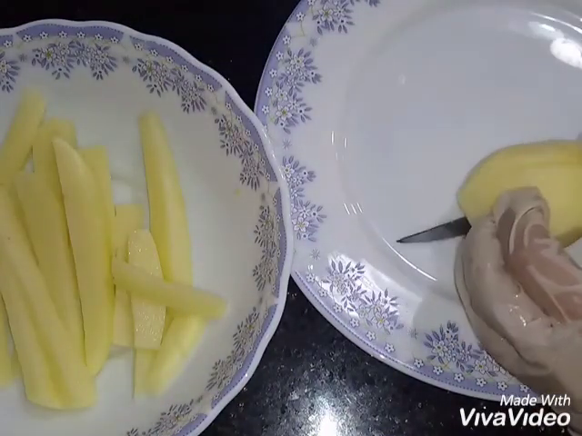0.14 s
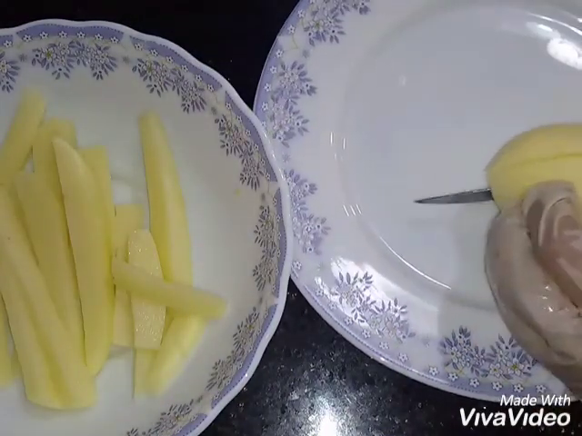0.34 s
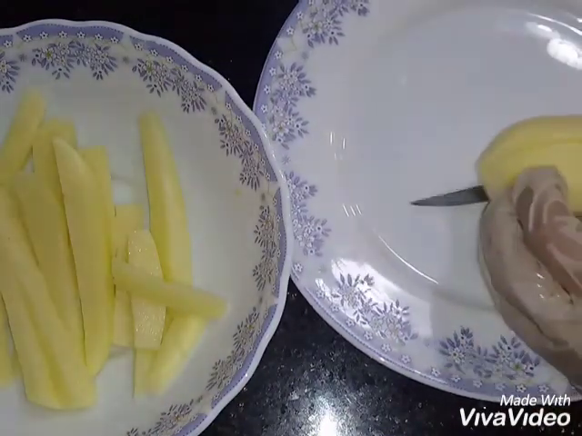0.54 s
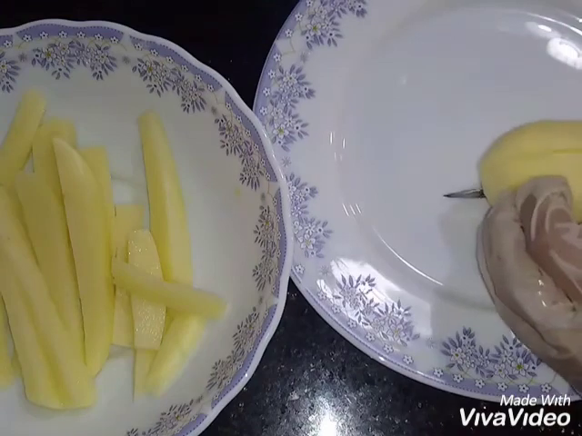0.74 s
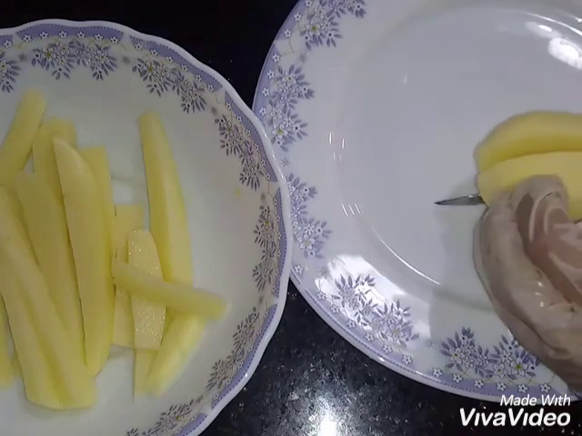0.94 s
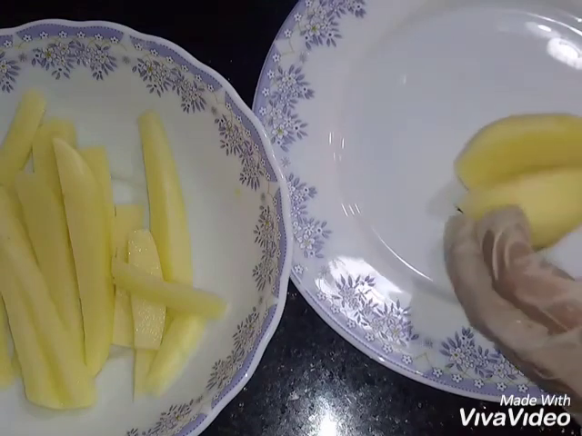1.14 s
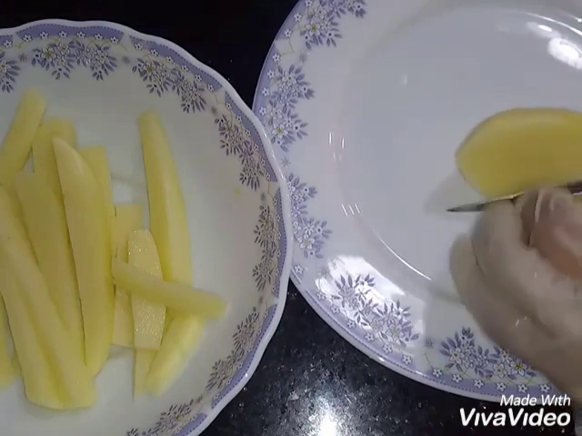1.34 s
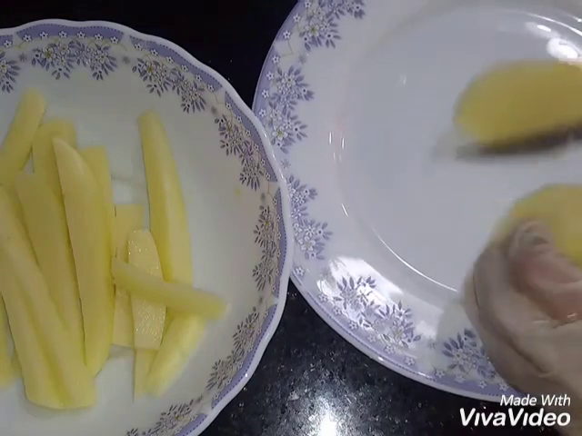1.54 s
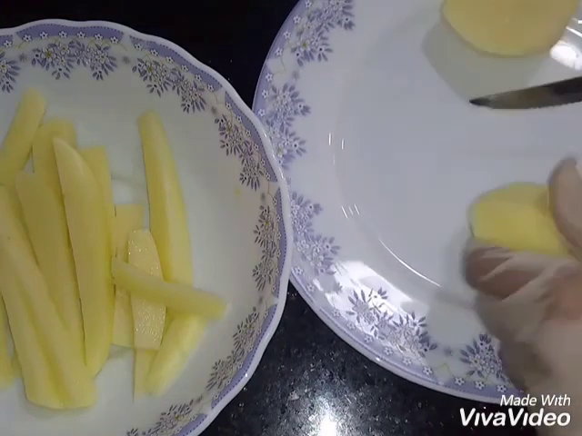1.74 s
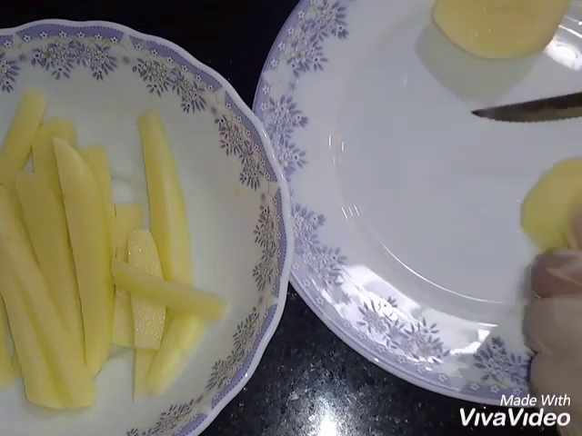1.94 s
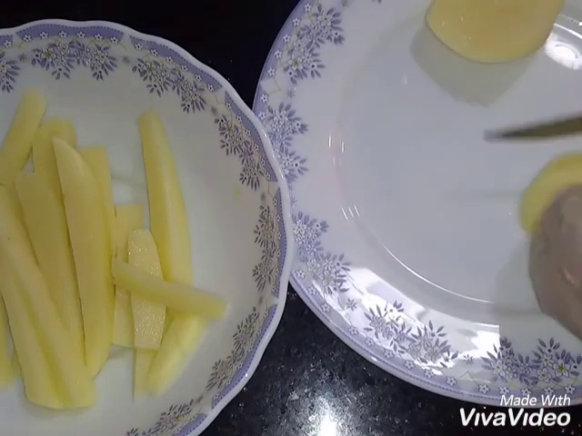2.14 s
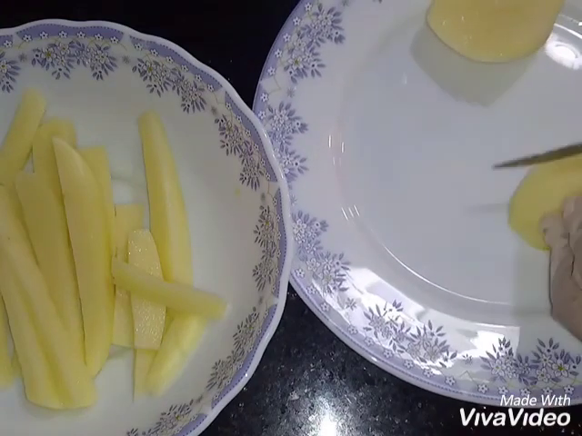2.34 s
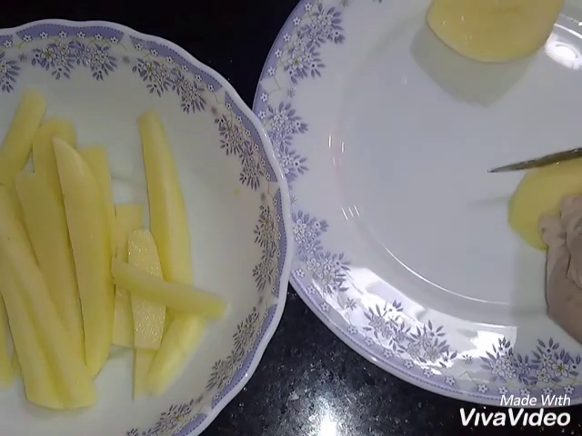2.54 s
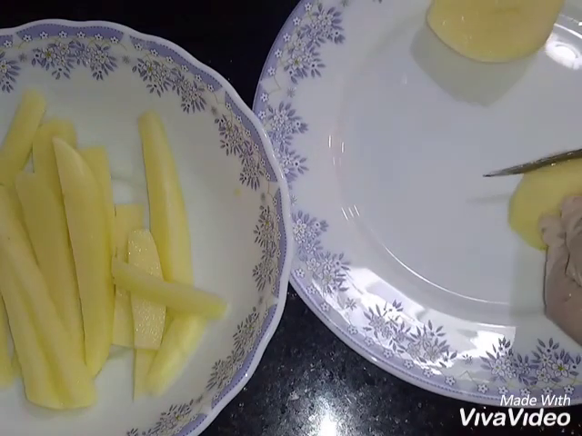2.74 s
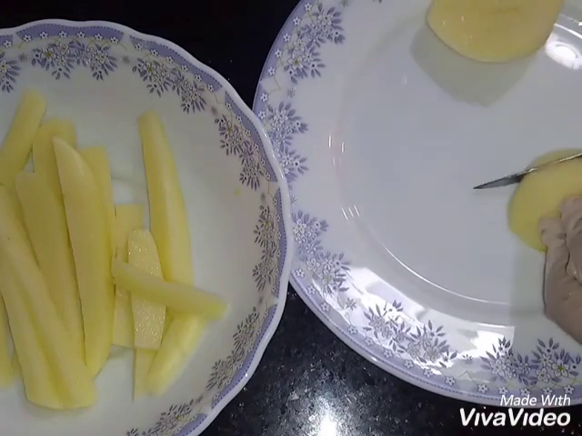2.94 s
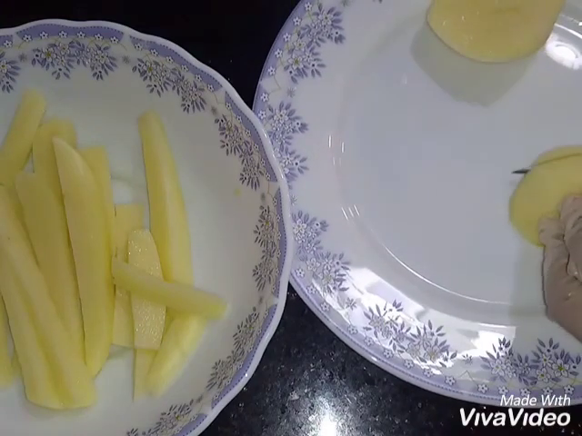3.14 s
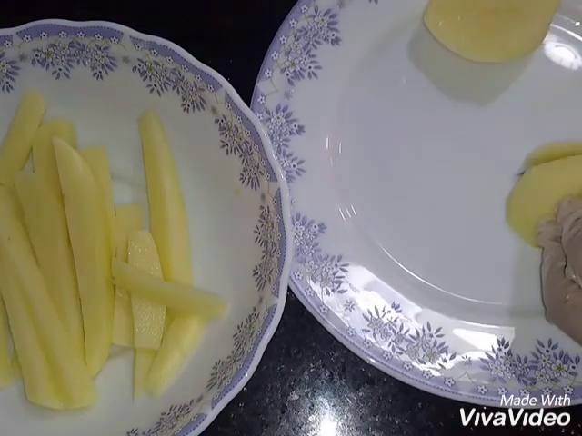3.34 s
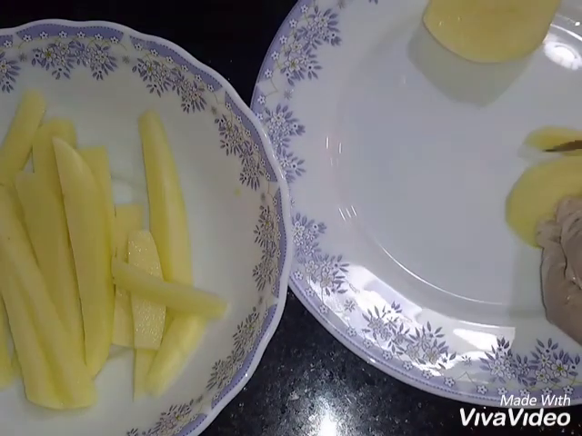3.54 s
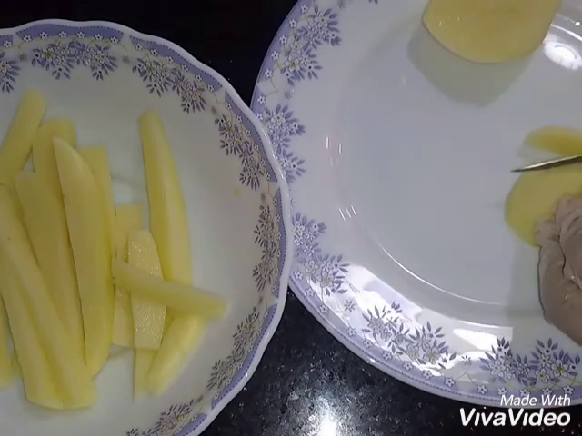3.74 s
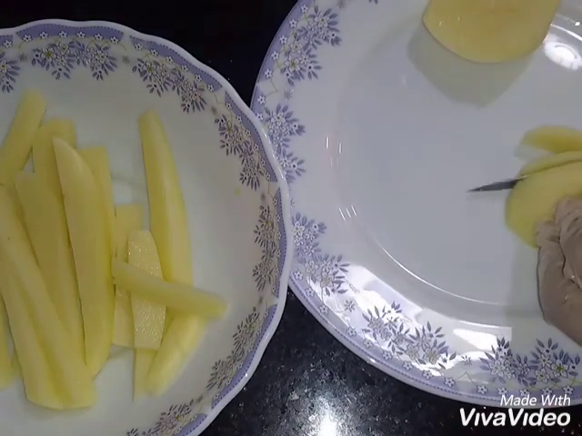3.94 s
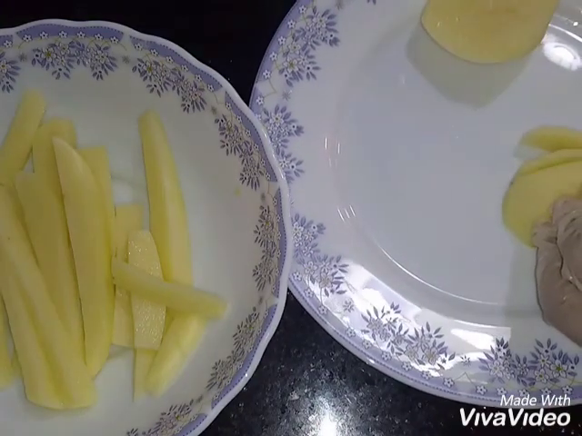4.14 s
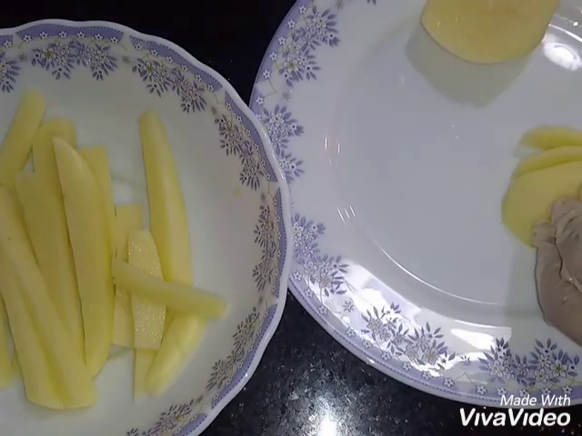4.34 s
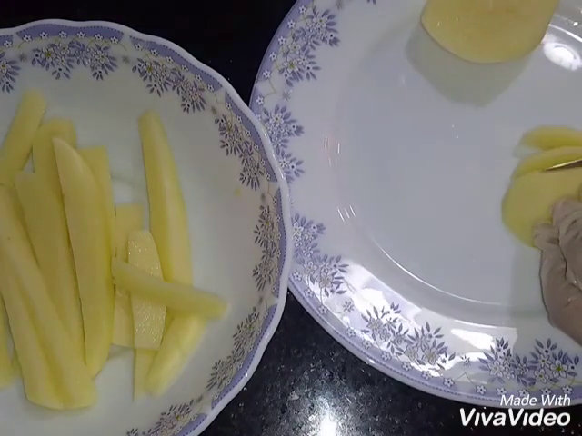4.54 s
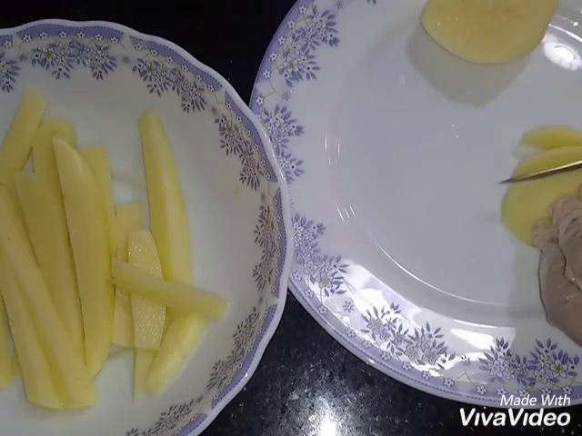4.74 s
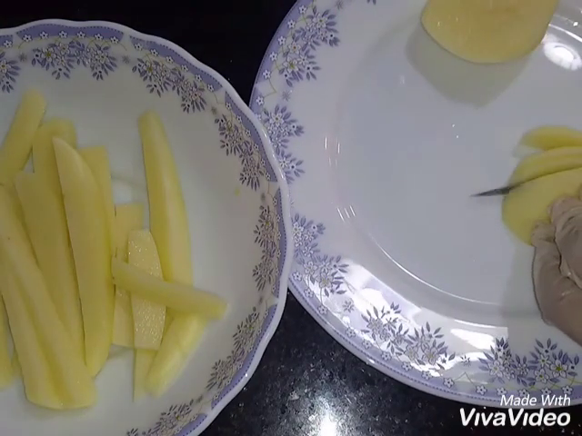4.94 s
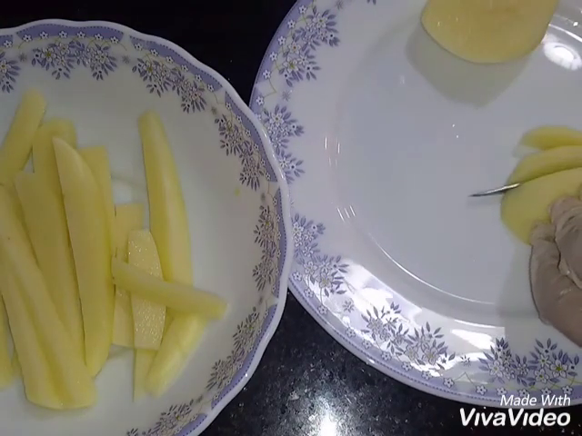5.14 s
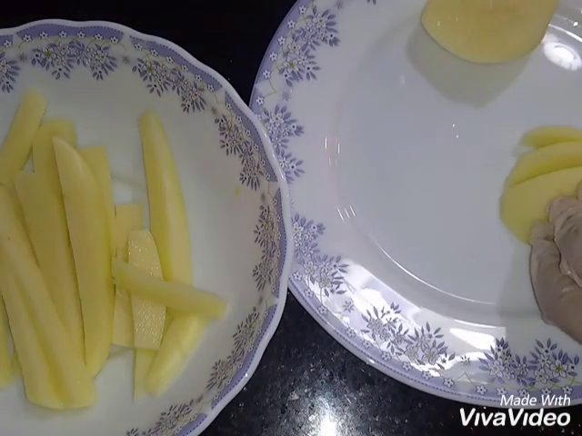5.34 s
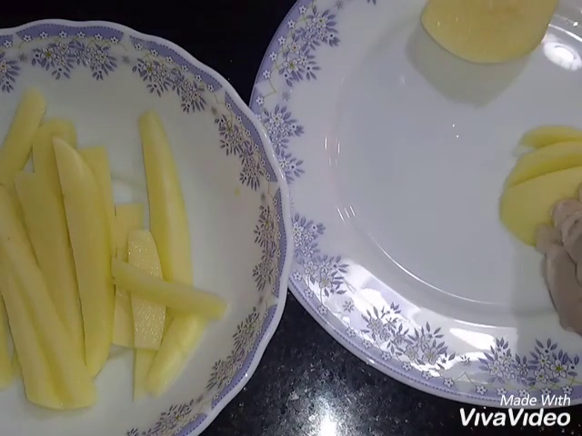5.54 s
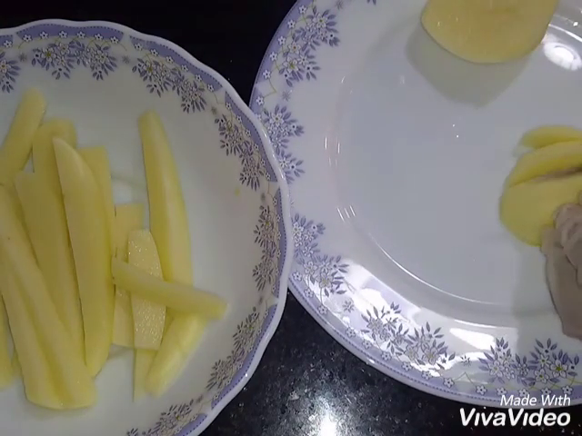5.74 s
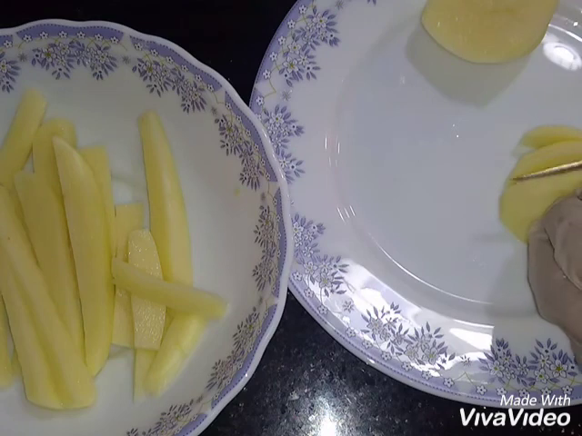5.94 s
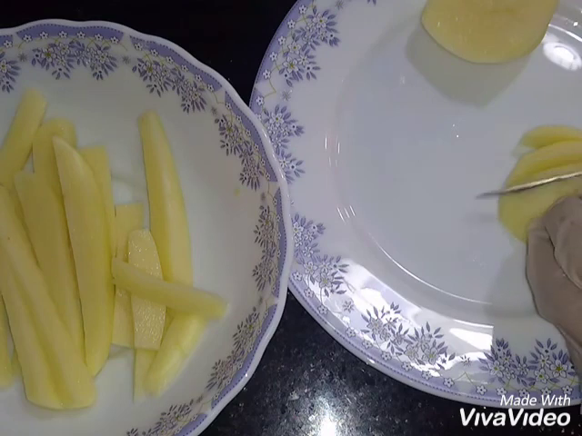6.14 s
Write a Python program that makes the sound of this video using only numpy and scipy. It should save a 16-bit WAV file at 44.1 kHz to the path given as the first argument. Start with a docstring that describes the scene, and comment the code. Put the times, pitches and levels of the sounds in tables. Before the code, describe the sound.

Close up in a hard-walled kitchen, a small knife crunches through raw potato and snaps free with bright, steely clicks, the loudest about one second in. Potato pieces then land with wet knocks on china. More crackling strokes and sharp snaps follow, then wet slides and a short squeak, and finally a clink of dishes. Faint room air and low appliance murmur lie beneath.

```python
"""A small knife slices a raw potato on a china plate in a hard-walled kitchen: bursting cells crackle as it cuts.
The blade cracks through the last flesh and snaps free or ticks on the plate, sounding as ringing modes and thuds.
Potato lands with wet knocks, wet steel squeaks, and late on the dishes clink; soft air noise and murmurs stay under it.
A limiter ducks each loud snap, so that the room's tail of fading noise swells up behind it."""
import sys
import numpy as np
from scipy import signal
from scipy.fft import rfft, irfft
from scipy.io import wavfile
from scipy.ndimage import uniform_filter1d, minimum_filter1d

SR = 44100
rng = np.random.default_rng(int(sys.argv[2]) if len(sys.argv) > 2 else 0)


def digitize_waveform(pressure):
    """Quantize a signal to 16-bit integers and store it at the path in sys.argv[1].

    Rows of a 2-D input are taken as channels; values are limited to [-1, 1].
    """
    field = np.atleast_2d(pressure).T
    bounded = np.clip(field, -1, 1)
    quanta = np.round(bounded * 32767).astype(np.int16)
    wavfile.write(sys.argv[1], SR, quanta)


N = 272538  # samples in the scene
BLOW_SIZE = SR // 3  # samples in one blow

# still kitchen air: f/Hz, level/dB per Hz
AIR_SPECTRUM = [(15, -59), (25, -19.5), (43, -13.5), (71, -11), (92, -10), (150, -7.5), (227, -17.5),
                (327, -20.5), (483, -20), (924, -22.5), (1590, -31), (1720, -25.5), (1910, -32.5),
                (5400, -28.5), (12400, -53), (16100, -61), (22000, -120)]
AIR_DB = -64
# faint murmurs of appliances: f/Hz, width/Hz, level/dB
MURMURS = [(96, 24, -67), (152, 31, -70), (336, 20, -78.5), (953, 100, -71)]

# the blade slides along the wet cut: t/s at the height, swell/s, level/dB, juice against flesh/dB
BLADE_SLIDES = [(0.136, 0.025, -66, 7), (0.482, .016, -54.5, 1), (1.505, .022, -66.5, 7.5),
                (1.584, .02, -64, 12), (1.715, 0.094, -65.5, 9), (2.171, 0.06, -59, 4),
                (3.291, 0.033, -57, -1.5), (3.568, 0.02, -48, 11.5), (4.18, .014, -52.5, -3),
                (4.245, 0.019, -52, -0.5), (4.474, 0.027, -49.5, 7.5), (4.817, 0.02, -67.5, -6),
                (5.173, .03, -47, 1), (5.309, 0.021, -52, -2), (5.468, 0.027, -42.5, 6),
                (6.009, 0.012, -71, 2)]
SLIDE_RELEASE, SLIDE_RING_DB = 1.71, -1  # release as a share of the swell; blade against the flesh
# the blade is pushed down through the flesh: t/s at the height, swell/s, level/dB
BLADE_PUSHES = [(0.187, 0.016, -41), (1.848, 0.025, -53), (3.061, 0.015, -48.5), (3.379, 0.01, -41),
                (4.063, 0.054, -40), (4.301, 0.0028, -48), (5.035, 0.079, -40.5)]
# release as a share of the swell; juice and blade against the flesh
PUSH_RELEASE, PUSH_JUICE_DB, PUSH_RING_DB = 0.33, -7.5, -16.5
QUICK_PUSH_S, QUICK_RING_DB = 0.014, 31  # a quick push makes the blade ring more
CELL_SPREAD_DB = 3.0  # how far burst sizes vary
# tearing potato flesh: f/Hz, level/dB per Hz
FLESH_SPECTRUM = [(100, -22.5), (400, -14), (680, -11.5), (1200, -8.5), (1900, 3.5), (3000, 5.5), (4500, 4),
                  (7000, -7), (12000, -41.5)]
# juice on the blade: f/Hz, level/dB per Hz
JUICE_SPECTRUM = [(200, -36), (1500, -29), (3000, -2), (4500, 6.5), (5600, 4.5), (6800, 0.5), (8000, -11),
                  (10000, -9.5), (12000, -23.5)]
# steel blade, damped by hand and potato: f/Hz, level/dB, time to fade 60 dB/s
BLADE_MODES = [(2597, -9.5, 0.024), (2933, -2, 0.016), (3426, -5, 0.013), (4075, -5, 0.0086),
               (4180, -11, 0.035), (4330, -10.5, 0.012), (5593, -8, 0.012), (6285, -9.5, 0.0069),
               (7057, -17, 0.018), (8630, -15.5, 0.0043), (9630, -22, 0.0061)]

# the blade snaps free or ticks against the plate: t/s, strength/dB, brightness/dB per octave
BLADE_SNAPS = [(0.2035, -11.5, -1), (0.4096, -53, -5), (0.7663, -24, -1.5), (1.0014, -63.5, 19),
               (1.0155, 4, 1), (1.785, -52.5, 5.5), (2.222, -48, 2), (2.7327, -46.5, -4.5),
               (2.825, -53.5, -3.5), (3.0639, -12.5, 1), (3.3809, -12.5, 1.5), (3.547, -32.5, 12.5),
               (4.0845, -21.5, 0), (4.3047, -13.5, 0.5), (4.3155, -42, 4), (5.1402, -38.5, -3),
               (5.212, -32, -1.5)]
# what a snap shakes besides the blade (dB against the blade)
SNAP_CRACK_DB, SNAP_PLATE_DB, SNAP_KNOCK_DB, SNAP_THUMP_DB = -6, -18, -23, -32
# the crack as the last flesh gives way: f/Hz, level/dB per Hz
CRACK_SPECTRUM = [(100, -24), (450, -16.5), (650, -19.5), (880, -3), (1500, -19), (2100, -3), (3200, 3.5),
                  (4200, 1.5), (5000, -2), (6600, -5), (8000, -10.5), (9700, -4.5), (12000, -24.5)]
# china plate, damped by the potato on it: f/Hz, level/dB, time to fade 60 dB/s
PLATE_MODES = [(1205, -18, 0.022), (1364, -6, 0.07), (1556, -2, 0.047), (1790.5, -8, 0.11),
               (2140, -13.5, 0.026), (2470, -21, .12), (2637, 0, .05), (3460, -14, 0.13),
               (4040, -6.5, 0.12), (4520, -8, 0.079), (5400, -4.5, 0.049), (5700, 2, 0.048),
               (7760, -17, 0.065)]
# soft potato on china: f/Hz, level/dB per Hz
KNOCK_SPECTRUM = [(100, -13), (250, -11), (500, 2), (680, -7.5), (1000, 1.5), (1400, 0), (1800, -1.5),
                  (2300, -11.5), (4000, -29), (10000, -36.5)]
# the counter under the plate: f/Hz, level/dB per Hz
THUMP_SPECTRUM = [(30, -32.5), (70, -7.5), (110, 4), (160, -2), (250, -6.5), (370, 0), (600, -10),
                  (1500, -48.5), (5000, -69)]

# potato lands on the plate or is shifted on it: t/s, strength/dB, firmness (0 a soft press, 1 a sharp rap)
POTATO_LANDINGS = [(0.226, -39, 0), (0.784, -44, 0.13), (1.8973, -22.5, 1), (1.95, -32, .8),
                   (1.9632, -42, 0.67), (2.0954, -38.5, 0.12), (2.105, -45.5, 0.08), (2.137, -34, 0.28),
                   (2.3585, -39.5, 0.39)]
# a soft press against its knock, and what full firmness adds
LANDING_PLATE_DB, FIRM_PLATE_DB = -12.5, 16
LANDING_THUMP_DB, FIRM_THUMP_DB = 4, -21
LANDING_SPLAT_DB = -10  # the wet face slaps the glaze
SOFT_TILT_DB, FIRM_TILT_DB = -7, 4.5  # the plate's high modes wake with firmness (dB per octave)

# wet potato squeaks on the steel: t/s, length/s, first f/Hz, last f/Hz, level/dB
WET_SQUEAKS = [(1.205, 0.081, 2950, 3000, -46.5), (1.564, 0.019, 2985, 2880, -56),
               (1.66, .10, 3150, 2860, -51.5), (1.765, 0.016, 3000, 2880, -61),
               (1.778, 0.016, 2730, 2650, -47), (5.125, 0.075, 2800, 2950, -45)]
# the plate touches the bowl: t/s, level/dB
DISH_CLINKS = [(5.6964, -24), (5.724, -35.5)]
# china bowl: f/Hz, level/dB, time to fade 60 dB/s
BOWL_MODES = [(996, -8, 0.08), (1723, -14, 0.12), (2630, -16.5, 0.063), (3555, -6.5, 0.02),
              (3970, -2, 0.028), (4430, 6, 0.026), (4870, 3, 0.022), (5810, -0.5, 0.027),
              (6640, -17, 0.023), (7940, -19, 0.1), (9900, -39, 0.035), (11100, -24, .04)]

# kitchen reverberation: f/Hz, time to fade 60 dB/s
ROOM_FADE = [(100, 0.18), (500, 0.37), (1500, 0.38), (3000, 0.41), (6000, 0.38), (11000, 0.3)]
# what the kitchen gives back: f/Hz, level/dB
ROOM_SPECTRUM = [(40, -8.5), (110, 4), (220, -12), (430, -3), (800, -8), (1600, -10), (3000, -13),
                 (4000, -8.5), (5500, -10.5), (10000, -10.5)]


def from_db(db):
    """Turn decibels into gain."""
    return 10 ** (np.asarray(db) / 20)


def rms_one(x):
    """Scale to an average strength (rms) of 1."""
    return x / np.sqrt(np.mean(x ** 2) + 1e-20)


def attack_one(x):
    """Scale to rms 1 over the first 8 ms."""
    return x / np.sqrt(np.mean(x[:350] ** 2) + 1e-20)


def at_hz(points, hz):
    """Read a table between its points, on a log-frequency axis."""
    table = np.array(points)
    return np.interp(np.log(hz + 1e-9), np.log(table[:, 0]), table[:, 1])


def colour(x, spectrum, tilt_db=0):
    """Filter without pre-echo to a given spectrum, tilted above 1 kHz by so many dB an octave; rms 1."""
    hz = np.fft.rfftfreq(len(x), 1 / SR)
    db = at_hz(spectrum, hz) + tilt_db * np.log2(np.maximum(hz, 1000))
    # keeping only the first half of the cepstrum makes the filter act after its cause
    cepstrum = irfft(np.log(from_db(db)), len(x))
    cepstrum[len(x) // 2:] = 0
    response = np.exp(2 * rfft(cepstrum) - 2 * cepstrum[0])
    return rms_one(irfft(rfft(x) * response, len(x)))


def add(track, s, sound):
    """Mix a sound in at a time."""
    start = max(round(s * SR), 0)
    track[start:start + len(sound)] += sound[:max(N - start, 0)]


def dying(t60, size=BLOW_SIZE):
    """Fade exponentially, by 60 dB in t60 seconds."""
    return from_db(-60 * np.arange(size) / SR / max(t60, 1e-4))


def wander(per_s, size):
    """Random bends of spread about 1, so many a second."""
    bends = rng.standard_normal(size // 20)
    return np.interp(np.arange(size) / SR * per_s, np.arange(size // 20), bends)


def ringing(modes, tilt_db=0, detune=0, scatter_db=0.27):
    """Struck modes, alternating in sign; contact point and grip shift their strengths and pitches."""
    t = np.arange(BLOW_SIZE) / SR
    out = np.zeros(BLOW_SIZE)
    for k, (hz, db, t60) in enumerate(modes):
        strength = from_db(db + tilt_db * np.log2(hz / modes[0][0]) + scatter_db * rng.normal())
        pitch = hz * (1 + detune * rng.normal())
        out += strength * (-1) ** k * np.sin(2 * np.pi * pitch * t) * dying(t60)
    return out


def smear(x, lag_s, bounce):
    """Waves run to and fro in the struck body: three allpass loops spread a click in time."""
    g = np.clip(bounce, 0, .75)
    hz = np.fft.rfftfreq(len(x), 1 / SR)
    lags = lag_s * np.arange(1, 4) * rng.uniform(.75, 1.25, 3)
    loops = np.exp(-2j * np.pi * np.outer(lags, hz))
    allpass = np.prod((g + loops) / (1 + g * loops), axis=0)
    return irfft(rfft(x) * allpass, len(x))


def strike(modes, tilt_db, lag_s, bounce, detune=0):
    """One hard contact sets the modes ringing, smeared by waves inside the body."""
    return attack_one(smear(ringing(modes, tilt_db, detune), lag_s, bounce))


def thud(spectrum, t60, push, tilt_db=0):
    """One push, then crowded, quickly dying modes heard as a burst of noise."""
    contact = rng.standard_normal(BLOW_SIZE) * dying(t60)
    contact[0] += push * np.linalg.norm(contact)
    return attack_one(colour(contact, spectrum, tilt_db))


def background(waver_db=2.5):
    """Steady air noise with a few narrow murmurs that waver."""
    out = from_db(AIR_DB) * colour(rng.standard_normal(N), AIR_SPECTRUM)
    hz = np.fft.rfftfreq(N, 1 / SR)
    for centre, width, db in MURMURS:
        band = 1 / (1 + (2 * (hz - centre) / width) ** 2)
        murmur = rms_one(irfft(rfft(rng.standard_normal(N)) * band, N))
        out += from_db(db + waver_db * wander(5.8, N)) * murmur
    return out


def stroke(s, rise, fall, juice_db, ring_db, cells_per_s=5000, edge=1.57, judder_db=1.5,
           mirror=0.4, rumble_db=-17.5):
    """Cells burst in a dense crackle under the edge, juice hisses, and the blade rings along."""
    out = np.zeros(N)
    t = np.arange(-SR // 3, SR // 3) / SR  # seconds from the height of the stroke
    size_db = CELL_SPREAD_DB * np.minimum(rng.exponential(1, len(t)), 4)
    sizes = from_db(size_db) * rng.choice([-1, 1], len(t))
    bursts = sizes * (rng.random(len(t)) < cells_per_s / SR)

    flesh = colour(bursts, FLESH_SPECTRUM)
    juice = from_db(juice_db) * colour(bursts, JUICE_SPECTRUM)
    ring = signal.fftconvolve(bursts, ringing(BLADE_MODES, tilt_db=-7.0))[:len(t)]
    crunch = flesh + juice + from_db(ring_db) * rms_one(ring)
    # the plate mirrors the sound; the delay shrinks as the edge sinks
    delay = rng.uniform(.0005, .0011) * (1 - t)
    crunch = crunch + mirror * np.interp(t - delay, t, crunch)
    # the pushing hand rumbles through plate and counter
    rumble = from_db(rumble_db) * colour(rng.standard_normal(len(t)), THUMP_SPECTRUM)

    swell = np.exp(-np.abs(t / np.where(t < 0, rise, fall)) ** edge)
    pressure = swell * from_db(judder_db * wander(170.8, len(t)))
    sound = pressure * (crunch + rumble)
    add(out, s + t[0], sound[s + t >= 0])
    return out


def slicing():
    """Pushes build up and stop short; slides are wetter and trail away."""
    out = np.zeros(N)
    for s, swell, db, juice_db in BLADE_SLIDES:
        out += from_db(db) * stroke(s, swell, SLIDE_RELEASE * swell, juice_db, SLIDE_RING_DB)
    for s, swell, db in BLADE_PUSHES:
        ring_db = PUSH_RING_DB + QUICK_RING_DB / (1 + (swell / QUICK_PUSH_S) ** 2)
        out += from_db(db) * stroke(s, swell, PUSH_RELEASE * swell, PUSH_JUICE_DB, ring_db)
    return out


def snaps():
    """The last flesh cracks, the blade rings, and plate, potato and counter take fixed shares of the blow."""
    out = np.zeros(N)
    for s, db, tilt_db in BLADE_SNAPS:
        blade = strike(BLADE_MODES, tilt_db, lag_s=0.0001101, bounce=0.39, detune=0.016)
        crack = from_db(SNAP_CRACK_DB) * thud(CRACK_SPECTRUM, t60=0.043, push=0.63, tilt_db=tilt_db)
        plate = from_db(SNAP_PLATE_DB) * strike(PLATE_MODES, tilt_db=4.5, lag_s=0.00011, bounce=0.26)
        knock = from_db(SNAP_KNOCK_DB) * thud(KNOCK_SPECTRUM, t60=.055, push=0.21)
        thump = from_db(SNAP_THUMP_DB) * thud(THUMP_SPECTRUM, t60=0.14, push=0.26)
        add(out, s, from_db(db) * (blade + crack + plate + knock + thump))
    return out


def landings():
    """A wet knock: a firm one rings the plate, a soft one thumps through to the counter."""
    out = np.zeros(N)
    for s, db, firm in POTATO_LANDINGS:
        plate_gain = from_db(LANDING_PLATE_DB + FIRM_PLATE_DB * firm)
        thump_gain = from_db(LANDING_THUMP_DB + FIRM_THUMP_DB * firm)
        tilt_db = SOFT_TILT_DB + FIRM_TILT_DB * firm
        knock = thud(KNOCK_SPECTRUM, t60=.055, push=0.27)
        plate = plate_gain * strike(PLATE_MODES, tilt_db, lag_s=0.00012, bounce=0.14)
        thump = thump_gain * thud(THUMP_SPECTRUM, t60=0.095, push=0.18)
        splat = from_db(LANDING_SPLAT_DB) * thud(JUICE_SPECTRUM, t60=0.027, push=.5)
        add(out, s, from_db(db) * (knock + plate + thump + splat))
    return out


def squeaks(width_hz=65.0):
    """Uneven stick and slip: a rough, narrow tone that glides."""
    out = np.zeros(N)
    low_pass = signal.butter(2, width_hz, fs=SR, output="sos")
    for s, length, first_hz, last_hz, db in WET_SQUEAKS:
        along = np.clip(np.arange(BLOW_SIZE) / SR / length, 0, 1)  # 0 at the start, 1 at the end
        phase = 2 * np.pi * np.cumsum(first_hz + (last_hz - first_hz) * along) / SR
        grip = signal.sosfilt(low_pass, rng.standard_normal((2, BLOW_SIZE)))
        tone = rms_one(grip[0] * np.cos(phase) + grip[1] * np.sin(phase))
        swell = np.sqrt(np.abs(np.sin(np.pi * along)))
        add(out, s, from_db(db) * tone * swell)
    return out


def clinks():
    """Glaze grinds briefly on glaze while the bowl rocks and rings."""
    out = np.zeros(N)
    for s, db in DISH_CLINKS:
        bowl = strike(BOWL_MODES, 0, lag_s=0.00027, bounce=0.61)
        hiss = from_db(-5.5) * thud(JUICE_SPECTRUM, t60=0.059, push=0.48)
        scrape = from_db(-15.5) * thud(KNOCK_SPECTRUM, t60=0.22, push=0.44, tilt_db=8.0)
        add(out, s, from_db(db) * (bowl + hiss + scrape))
    return out


def kitchen(x, build_s=0.00069):
    """Reflections off tile and stone thicken into a tail that dies band by band."""
    white = rfft(rng.standard_normal(SR))
    hz = np.fft.rfftfreq(SR, 1 / SR)
    centres = np.geomspace(60, 15000, 9)
    tail = np.zeros(SR)
    # each share is 1 at its own band and fades to 0 at the neighbours
    for centre, share in zip(centres, np.eye(len(centres))):
        band = irfft(white * at_hz(np.c_[centres, share], hz), SR)
        tail += band * dying(at_hz(ROOM_FADE, centre), SR)
    tail = irfft(rfft(tail / np.linalg.norm(tail)) * from_db(at_hz(ROOM_SPECTRUM, hz)), SR)
    tail = tail * (1 - np.exp(-(np.arange(SR) / SR / build_s) ** 2))
    return signal.fftconvolve(x, tail[:SR * 3 // 4])[:N]


def scene():
    """Knife work close by, the room around it."""
    near = slicing() + snaps() + landings() + squeaks() + clinks()
    return (near + kitchen(near) + background())[None]


def limiter(x, threshold_db=-16.0, squeeze=0.47, release_db_per_s=236.5, hold_s=0.015):
    """The gain drops a few milliseconds ahead of a peak, is held briefly and climbs back steadily."""
    over = np.maximum(20 * np.log10(np.abs(x) + 1e-9) - threshold_db, 0) * np.clip(squeeze, 0, 1)
    climb = release_db_per_s * np.arange(N) / SR
    cut = np.maximum.accumulate(over + climb) - climb
    span = int(np.clip(hold_s, .001, .1) * SR)
    held = minimum_filter1d(-cut, span, origin=(span - 1) // 2)
    # reach ahead of the peak, then smooth the steps
    gain_db = uniform_filter1d(minimum_filter1d(held, size=160), size=160)
    return x * from_db(gain_db)


def record(dry, dull_hz=10460.0, cutoff_hz=12100):
    """Limiter, rounded peaks, a softened top, then a steep cut."""
    limited = limiter(dry[0])
    rounded = limited / (1 + (limited / .72) ** 4) ** .25
    soft = signal.sosfilt(signal.butter(4, dull_hz, fs=SR, output="sos"), rounded)
    top_cut = signal.ellip(10, .3, 90, cutoff_hz, fs=SR, output="sos")
    return signal.sosfilt(top_cut, soft)[None]


dry = scene()
out = record(dry)
digitize_waveform(out)
```